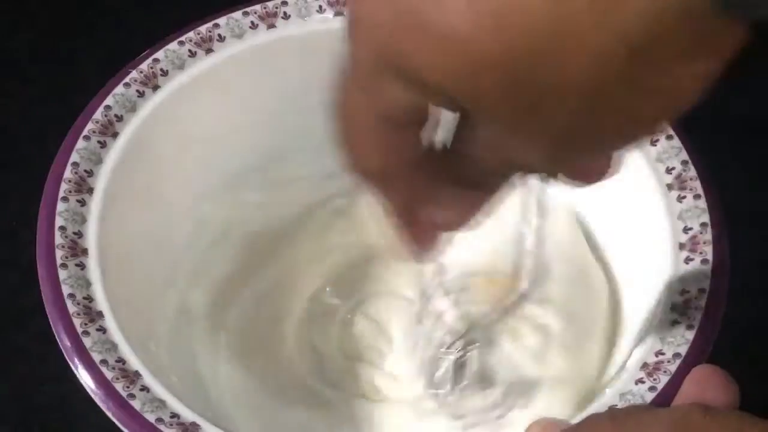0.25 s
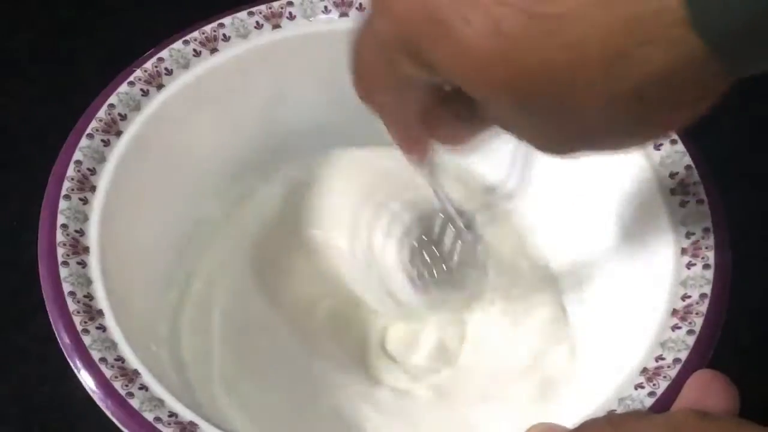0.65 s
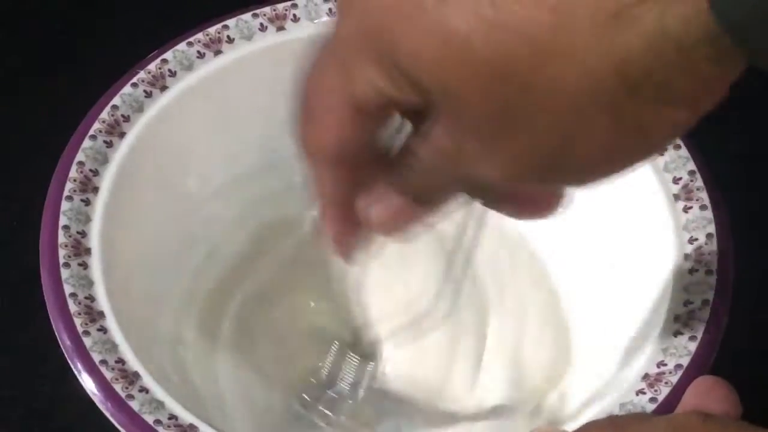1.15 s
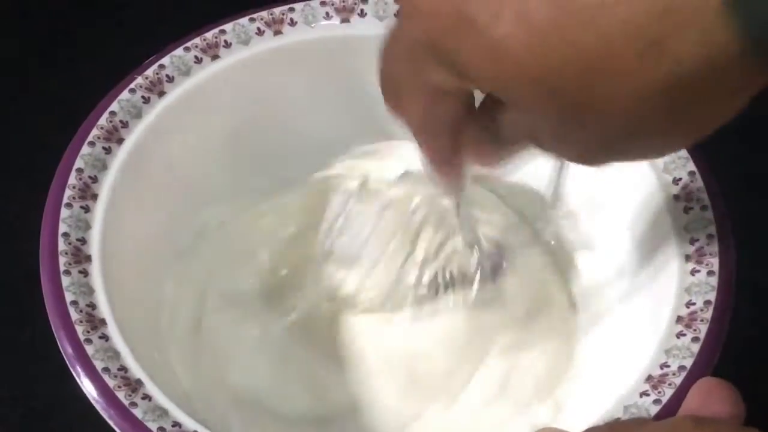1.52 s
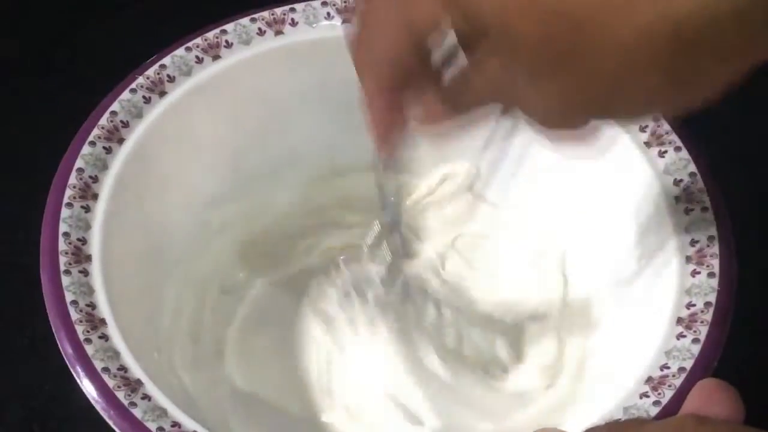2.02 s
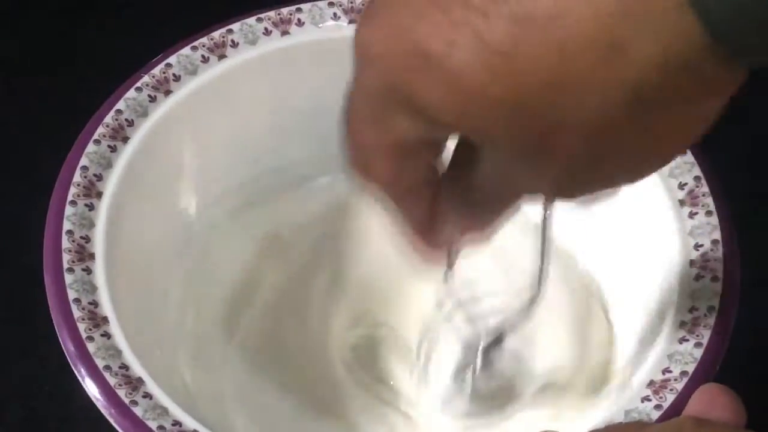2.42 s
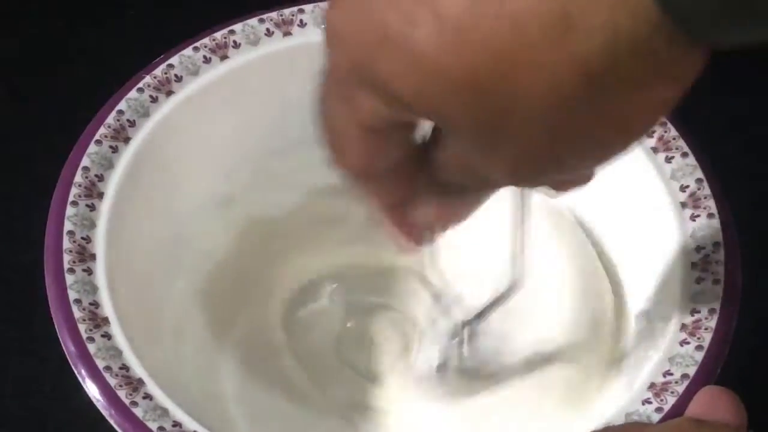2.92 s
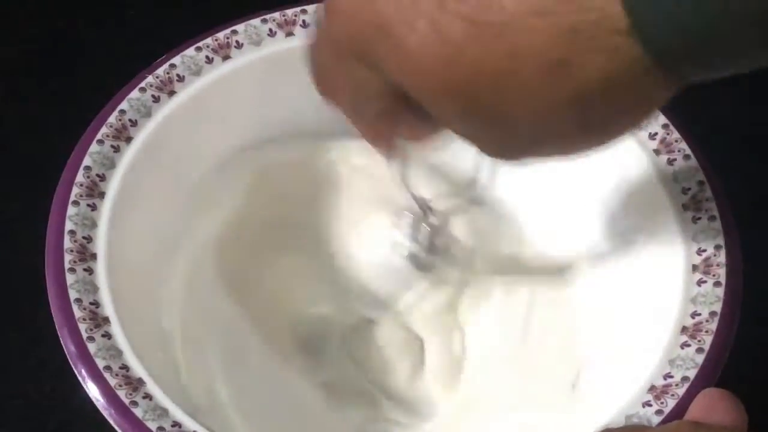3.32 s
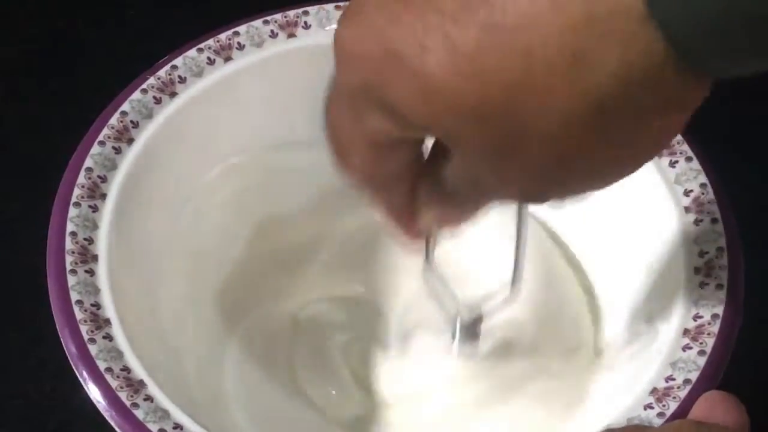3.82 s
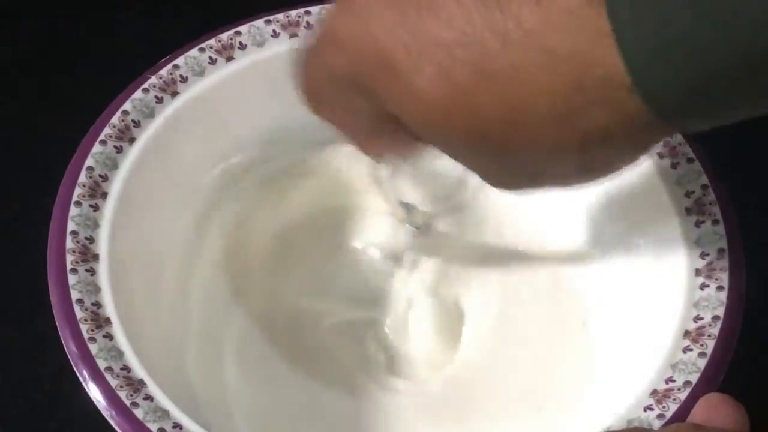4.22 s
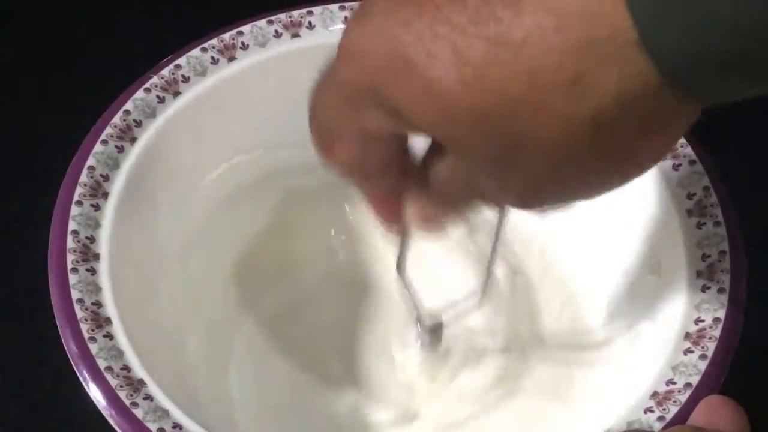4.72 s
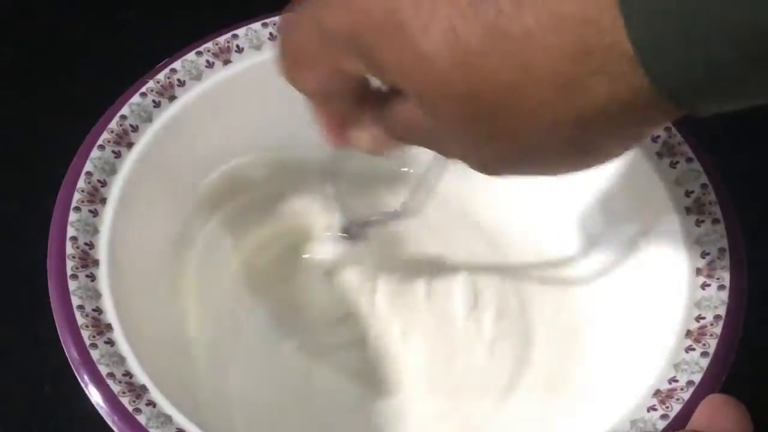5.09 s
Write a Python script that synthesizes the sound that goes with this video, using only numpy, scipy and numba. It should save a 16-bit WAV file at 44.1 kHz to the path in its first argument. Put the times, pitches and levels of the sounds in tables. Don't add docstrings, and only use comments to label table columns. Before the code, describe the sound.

A wire whisk whirls fast through thick cream in a hard plastic bowl, its wires clicking, knocking and scraping wetly, close up.

```python
import sys
import numpy as np
from scipy import signal
from scipy.fft import rfft, irfft
from scipy.io import wavfile
from scipy.ndimage import uniform_filter1d
from numba import njit

SR = 44100
rng = np.random.default_rng(int(sys.argv[2]) if len(sys.argv) > 2 else 0)


def persist_wave(psi):
    counts = np.round(np.clip(psi, -1, 1) * 32767).astype(np.int16)
    wavfile.write(sys.argv[1], SR, np.atleast_2d(counts).T)


def boost(x):
    u = np.asarray(x, float) / 20
    return 10 ** u


N = 236050

# [t/s, peak level/dB, wall ring f/Hz, ring level/dB re peak, skid level/dB]
KNOCKS = [(.0088, -14, 1721, -5.5, -50.5), (0.7316, -22, 910.7, -18, -61),
          (0.9575, -15.5, 1130, -23.5, -34.5), (1.312, -14.5, 4350, -9, -56.5),
          (1.5694, -6.5, 1620, -9, -31), (1.573, -5, 790, -12, -55.5), (1.5778, -22.5, 6624, 1, -58.5),
          (1.628, -10.5, 4396, -13, -58.5), (1.7779, -10, 835.1, -4, -27), (1.782, -9.5, 1639, -5.5, -50),
          (1.871, -13.5, 861.4, -22, -53.5), (1.9687, -19, 4100, -2.5, -60.5), (1.992, -7, 6379, 0, -15.5),
          (1.9965, -10, 8700, -5, -56.5), (2.1012, -10, 4234, -18.5, -32), (2.3956, -24, 4096, 13, -39.5),
          (2.6996, -15.5, 2584, -1, -61.5), (3.034, -15.5, 5244, -9.5, -47.5),
          (3.164, -17.5, 2796, -25, -34), (3.753, -17, 2560, 2.5, -45.5), (4.3251, -17, 952.5, -3.5, -40),
          (4.4936, -15.5, 905.2, -26.5, -30.5), (4.97, -14, 1022, -13.5, -53.5),
          (5.1707, -12.5, 3488, -16.5, -38.5)]
# [t/s, peak level/dB, wall ring f/Hz, skid level/dB]
TICKS = [(0.2544, -26.5, 1954, -57.5), (0.6586, -20, 2679, -40), (0.83, -19.5, 1546, -54.5),
         (1.0346, -20, 1081, -46), (1.134, -17.5, 3966, -40.5), (1.1853, -22, 4100, -37.5),
         (1.367, -22, 1870, -63.5), (1.4428, -20, 1917, -42), (1.516, -25.5, 843.6, -45),
         (1.848, -17.5, 2016, -58.5), (2.055, -23, 1973, -40), (2.197, -19, 2733, -71),
         (2.229, -23, 819.1, -39), (2.276, -27.5, 5846, -33), (2.6539, -17.5, 4119, -49.5),
         (3.069, -16, 1441, -58), (3.3516, -25, 2855, -32.5), (3.385, -17, 1453, -41),
         (3.449, -25, 3900, -64.5), (3.4798, -25, 2835, -67), (3.542, -49.5, 1485, -39.5),
         (3.614, -17, 1454, -35), (3.6958, -18.5, 2898, -49), (3.852, -22, 2293, -31),
         (3.932, -23, 1278, -41.5), (3.9953, -27.5, 3940, -45.5), (4.117, -19.5, 1206, -33),
         (4.175, -21.5, 1650, -34.5), (4.723, -45, 4433, -37.5), (4.877, -24.5, 3515, -55)]
# [t/s, peak level/dB, wall ring f/Hz, ring level/dB re peak]
BOUNCES = [(.321, -21.5, 2450, -3), (0.37, -21.5, 2021, -7.5), (0.5016, -20, 1140, -25),
           (0.5648, -20, 1278, -11), (0.679, -15.5, 2831, -17), (1.1734, -24, 1701, -21),
           (1.2147, -21.5, 4416, -17), (1.326, -20, 2958, -9), (1.341, -29, 2069, 5),
           (1.64, -29.5, 971, -12), (1.6585, -18.5, 1639, -10), (1.6823, -26, 790, -10),
           (1.755, -18, 1976, -8), (1.8328, -21, 1490, -2.5), (1.9056, -20, 2450, -5.5),
           (2.0059, -27, 790, 4), (1.9945, -36, 910, -3), (2.08, -16.5, 1416, -13),
           (2.4596, -21.5, 2819, -11.5), (2.806, -26, 2776, -5.5), (2.8783, -19, 3851, -9),
           (2.9491, -23, 1069, -6), (2.977, -24.5, 3578, 6), (3.1878, -16, 3953, -10),
           (3.2544, -19.5, 3135, -8), (3.4052, -36, 2832, 10.5), (3.5867, -21, 3607, -24.5),
           (3.8655, -23, 2660, 0.5), (3.9502, -23, 3883, -5), (4.129, -21.5, 936.2, -5),
           (4.7369, -30.5, 4326, 0)]
# [t/s, peak level/dB, wall ring f/Hz, ring level/dB
MORE_CONTACTS = [(0.307, -26, 3558, 2.5), (.327, -26.5, 4099, 2), (0.463, -26, 4306, -6.5),
                 (0.746, -38.5, 4049, 11), (0.812, -42.5, 1412, 0), (.917, -23, 3901, 1.5),
                 (1.086, -23.5, 6496, -2.5), (1.115, -21, 1904, -4.5), (2.1738, -25.5, 4100, -9.5),
                 (3.103, -23.5, 2928, -7.5), (3.266, -25.5, 4433, -7), (3.709, -30, 8393, 2),
                 (3.7459, -37, 2900, 4), (3.8048, -30, 2501, -1.5), (3.857, -20.5, 7266, -8),
                 (3.879, -29, 3086, 5.5), (4.3165, -22, 6006, -11.5), (4.3275, -19, 2032, -2),
                 (4.408, -39.5, 2910, 5), (4.4597, -36, 3487, -5.5), (4.4975, -31, 4424, -1.5),
                 (4.553, -36.5, 2835, 7), (4.613, -36.5, 2492, 5), (4.769, -38, 2797, 9.5), (4.832, -32, 3084, 3),
                 (.275, -31, 3232, 0), (2.008, -28.5, 3782, -1), (2.131, -29.5, 3610, 4), (2.141, -29, 4417, 3),
                 (2.246, -36, 3710, 7), (3.593, -26.5, 5697, 2), (3.906, -31, 5719, -0.5), (5.13, -36.5, 2604, 6),
                 (5.315, -37.5, 3186, 2)]
# [t/s, peak level/dB, wall ring f/Hz]
TAPS = [(0.126, -33, 1635), (0.479, -25.5, 6760), (0.512, -25.5, 1123), (0.744, -27, 948.7),
        (0.8, -35, 1421), (1.149, -22, 6265), (1.198, -24, 6762), (1.243, -32, 1731), (1.298, -27, 4350),
        (2.04, -25, 1068), (2.348, -37.5, 2000), (2.39, -28.5, 4301), (2.54, -31.5, 4272),
        (2.638, -25.5, 4272), (2.648, -26.5, 3912), (2.891, -22, 3534), (2.961, -25.5, 3390),
        (3.024, -25, 4399), (3.173, -21.5, 4083), (3.38, -23.5, 1559), (3.54, -31.5, 1710),
        (3.632, -22.5, 3228), (3.761, -26.5, 5250), (3.785, -48, 2320), (3.959, -27.5, 2401),
        (4.286, -24.5, 4174), (5.002, -38.5, 940.6), (5.182, -28.5, 1137), (5.216, -26.5, 5550),
        (5.243, -37, 1551)]
# [t/s, peak level/dB]
FLICKS = [(0.1424, -22), (0.2452, -21), (0.2718, -25.5), (0.2972, -18.5), (0.3883, -14.5), (0.444, -20),
          (0.6165, -37.5), (0.7186, -31.5), (0.847, -17), (0.9113, -30.5), (1.467, -20), (1.7917, -13.5),
          (1.8922, -24), (2.339, -19.5), (2.596, -21), (2.902, -16.5), (2.9312, -19.5), (3.171, -31.5),
          (3.332, -31.5), (3.428, -23.5), (3.5256, -34.5), (3.837, -17.5), (3.9765, -21.5), (4.147, -24.5),
          (4.1644, -14.5), (4.353, -19.5), (4.818, -18.5), (5.0361, -19.5), (5.0774, -33), (5.096, -23.5)]
# [f/Hz, level/dB, t60/s]
DAMPED_MODES = [(790, -11, 0.0613), (1620, -9.5, 0.06165), (2320, -9.5, 0.04145), (2590.2, -5.5, 0.0382),
                (3534.9, 2.5, 0.01914), (4350, 10, 0.01694), (5750, 3, 0.03392), (6383.5, 1, 0.04113),
                (6974, 3, 0.01502), (8700, 3.5, 0.0196)]
# [t/s, scrape level/dB, weight on the bowl floor level/dB re scrape]
HAND_EFFORT = [(0.05, -46.5, -10), (.5, -46.5, -43.5), (.76, -44, -34.5), (1.17, -48, -8.5), (1.4, -49, -5),
               (1.5, -51.5, 3.5), (1.58, -46.5, 3.5), (1.95, -46.5, 2.5), (2.37, -45, -6), (2.47, -45, -21),
               (2.58, -47.5, -14), (2.63, -44.5, -14), (2.8, -44, -32), (3.85, -44.5, -3.5),
               (4.1, -47, -5.5), (4.7, -48, -2), (5.2, -45, -12), (5.35, -50, 4.5)]
# [quietest t/s, half length t/s, change of level/dB]
LIFTS = [(0.092, 0.043, -1), (0.186, 0.09, -4), (.64, 0.013, -0.5), (0.772, 0.0157, -6), (0.888, .015, 0),
         (0.998, 0.0276, -4), (1.403, 0.035, 1), (1.496, 0.0193, -3), (1.715, 0.0225, -4),
         (1.934, 0.027, -4), (2.327, .01, 1), (2.496, 0.0245, -3.5), (2.567, 0.0183, -2),
         (2.84, 0.019, -1.5), (3.147, 0.0112, 0.5), (3.302, 0.019, -3), (3.663, 0.013, 0.5),
         (3.74, 0.0112, -0.5), (3.925, .018, -4), (4.092, 0.0216, -5.5), (4.158, 0.0089, -1.5),
         (4.41, 0.0175, 1.5), (4.644, 0.032, 0), (4.906, 0.0174, -2), (5.185, 0.0103, -6),
         (5.286, 0.014, -1.5)]
# [loudest t/s, rise t/s, level/dB, air pocket f/Hz]
SWEEPS = [(0.148, 0.02645, -48.5, 6106), (.221, 0.02455, -63.5, 1863), (.322, 0.017823, -33.5, 2292),
          (0.399, 0.0246, -40.5, 5507), (.452, 0.01737, -37, 3644), (0.567, 0.02734, -38.5, 1224),
          (0.797, 0.0203, -39.5, 1284), (0.916, 0.01593, -36, 5501), (1.079, 0.025934, -31, 4233),
          (1.263, 0.0376, -41.5, 1990), (1.609, 0.051, -40.5, 2403), (1.85, 0.03245, -45.5, 2008),
          (2.03, 0.02516, -43.5, 3634), (2.172, 0.0201, -60, 4100), (2.457, 0.00992, -43.5, 2737),
          (2.724, 0.01368, -36, 3737), (2.895, 0.03958, -49, 3631), (2.98, 0.02047, -39, 3632),
          (3.107, 0.00604, -36, 2885), (3.268, 0.00551, -45.5, 4223), (4.246, 0.017, -38, 3101),
          (4.291, 0.01739, -43, 4576), (4.364, 0.01519, -35.5, 2965), (4.463, 0.0133, -40, 4379),
          (4.557, 0.0239, -36.5, 5424), (4.8, 0.0146, -37, 2695), (4.857, 0.002742, -33, 2898),
          (5.03, 0.0207, -54.5, 3430), (5.235, 0.011926, -34.5, 2899), (5.317, 0.02233, -38, 3062)]
# [t/s, length t/s, start f/Hz, end f/Hz, level/dB]
SQUEAKS = [(0.245, 0.04178, 1970, 2020, -44.5), (0.296, 0.02017, 1111, 1160, -39),
           (0.312, 0.03518, 2155, 2461, -48), (0.559, 0.01992, 1108, 1177, -35),
           (0.58, 0.019245, 1276, 1342, -30.5), (0.671, 0.02058, 2720, 2809, -42),
           (0.794, 0.0115, 1284, 1351, -46), (0.813, 0.01674, 1406, 1481, -43),
           (.83, .012, 1490, 1607, -40), (0.903, 0.026694, 2483, 2933, -36.5),
           (0.967, 0.0192, 1197, 1259, -39.5), (1.035, 0.0278, 1403, 1879, -42),
           (1.109, 0.02107, 1696, 2011, -43.5), (1.231, 0.03402, 1402, 1954, -47),
           (2.081, 0.01812, 1477, 1354, -37), (2.575, 0.02238, 2220, 1791, -47.5),
           (2.715, 0.0916, 1380, 1427, -51), (2.951, 0.03936, 1111, 1459, -43.5),
           (3.6, 0.01714, 1161, 1286, -39.5), (3.733, 0.02072, 2835, 2527, -45)]
# [t/s, length t/s, start f/Hz, end f/Hz, level/dB]
SQUELCHES = [(0.517, 0.035, 4200, 3835, -42), (0.513, 0.04135, 1142, 1157, -45.5),
             (.56, 0.01213, 5750, 5750, -32), (0.679, 0.01238, 5405, 5390, -41.5),
             (0.783, 0.02918, 5780, 5955, -43.5), (0.905, 0.0255, 5431, 5544, -35.5),
             (1.293, 0.0109, 4202, 4235, -41), (2.275, 0.04676, 5570, 6259, -44.5),
             (2.269, 0.02384, 1821, 1905, -40), (2.326, 0.02763, 1771, 1911, -46),
             (2.384, 0.02644, 2671, 2476, -37.5), (2.394, 0.00809, 2868, 5603, -26),
             (2.645, 0.00769, 6946, 7022, -38), (2.652, 0.0101, 3928, 4026, -36),
             (2.811, 0.0857, 1400, 1401, -50.5), (2.959, 0.00778, 4100, 3845, -37),
             (2.97, 0.01976, 3549, 3701, -35.5), (3.03, 0.04406, 1403, 1481, -51),
             (3.628, 0.01277, 3266, 3339, -46.5), (3.78, 0.01663, 2095, 2280, -39),
             (3.862, 0.01951, 2624, 2453, -41), (3.985, 0.05007, 1288, 1361, -51.5),
             (4.211, 0.0302, 1534, 1213, -43), (4.244, 0.02835, 3206, 3077, -41.5),
             (5.078, 0.0243, 1557, 1500, -46.5), (5.204, 0.01428, 5555, 5805, -45.5),
             (5.227, 0.0239, 2810, 3007, -55), (5.235, 0.014605, 1598, 1646, -41),
             (5.252, 0.02444, 1124, 1150, -47.5), (5.308, 0.0488, 3200, 3279, -45.5),
             (0.134, 0.0266, 1708, 1681, -47.5), (0.2, 0.03225, 1854, 1923, -51.5),
             (0.317, 0.04305, 1328, 1369, -47), (0.142, 0.00951, 5504, 5488, -42),
             (1.062, 0.02221, 5562, 5852, -39), (1.273, 0.0548, 1890, 2292, -44),
             (3.385, 0.03236, 1477, 1572, -42.5), (3.265, 0.00677, 4198, 4465, -35),
             (3.53, 0.02216, 1775, 1755, -42), (3.197, 0.02117, 3979, 4187, -40)]
# [f/Hz, spectral level/dB]
BOWL_COLOUR = [(290, -36), (500, -37), (623, -6), (810, -4.5), (1570, -1), (2160, -10), (2540, 3),
               (3160, 1), (4290, -0.5), (4900, 1.5), (6470, 1), (10600, 0), (12900, 3), (15600, 1.5),
               (16900, -10)]
# [f/Hz, width f/Hz, level/dB]
WALL_RESONANCES = [(1265.3, 1016, 3.5), (1650, 1000, -23), (2450, 457.7, 5), (4100, 79.6, 0)]
# [f/Hz, spectral level/dB]
KITCHEN_COLOUR = [(19, -18.5), (32, -2), (117, 2.5), (189, -5), (249, -7), (305, -7.5), (434, -7.5),
                  (512, -16), (650, -13), (840, -27), (1430, -120)]
# [f/Hz, width f/Hz, level/dB]
HUM = [(43.45, 11.59, -67.5), (61.55, 13.12, -70), (106.83, 5.59, -65), (147.27, 2.864, -69),
       (295.34, 8.593, -71)]
# [start t/s, length t/s, level/dB]
LABOUR = [(0.117, 0.1505, 13), (1.752, 0.5678, 11.5), (3.902, 0.6246, 11.5), (4.796, 0.5377, 14.5)]
# [start t/s, length t/s, level/dB]
OVERTONE_SWELL = (1.4654, 0.5233, 7.31)

TICK_RING_DB = -9
FLICK_DB, FLICK_RING_HZ, FLICK_RING_DB = -5.5, 2560, -15
TAP_DB, TAP_RING_DB = 2, -5.5
WIRE_LOW_HZ, WIRE_HIGH_HZ = 6814.3, 14914
HARD_DB, HARD_BIAS = -23.5, 0.6296
CRACK_S, SOFT_FROM_DB, SOFT_STRETCH = 0.0007, -16, 0.3
REBOUND_S, REBOUND_DB = .0016, -9
MODE_DB, MODE_SCATTER_DB = -11, 7.5
BOWL_LOW_HZ, BOWL_LOW_WIDTH_HZ = 860, 420
SKID_LATE_S, SKID_RISE_S, SKID_FALL_S = 0.000994, .0045, 0.018335
SKID_HALVES_DB = 10
OCTAVE_DB, OCTAVE_DB_PER_OCTAVE = -45, 10
SQUELCH_WIDTH = 0.03573
STUTTER_S, STUTTER_DB = 0.0039686, 1.5
WOBBLE = .02
ROOM_T60_S, ROOM_DB = 0.35, -13
KITCHEN_DB = -59.5


def ticks():
    crack, ring = np.zeros(N), np.zeros(N)
    t = np.arange(2000) / SR
    mode_hz, mode_db, t60 = np.transpose(DAMPED_MODES)[:, :, None]
    modes = boost(mode_db) * np.sin(2 * np.pi * mode_hz * t) * decay(t, t60)
    for s, db, wall_hz, wall_db in contacts():
        loop = rng.random() ** boost(-HARD_BIAS * max(db - HARD_DB, 0))
        wire_hz = WIRE_LOW_HZ * (WIRE_HIGH_HZ / WIRE_LOW_HZ) ** loop
        soft = boost(SOFT_STRETCH * np.clip(SOFT_FROM_DB - db, 0, 12))
        onset = 1 - np.exp(-t / 0.00019067 / soft)
        blow = onset * (np.exp(-t / CRACK_S / soft) + boost(-19) * np.exp(-t / 0.008954))
        late = int(REBOUND_S * (.5 + rng.random()) * SR)
        blow = blow + boost(REBOUND_DB) * np.pad(blow, (late, 0))[:len(t)]
        snap, push = rng.standard_normal((2, len(t))) * blow
        wire = band(snap, wire_hz, 1463.3)
        wall = band(push, wall_hz, 120 + 0.01717 * wall_hz)
        hit = snap + boost(-9.5) * np.diff(snap, prepend=0) + boost(12.0) * wire
        place = boost(MODE_SCATTER_DB * rng.standard_normal(len(modes)))
        body = signal.fftconvolve(push, place @ modes)[:len(t)]
        add(crack, s, peak(hit, db - 3.5))
        add(ring, s, peak(wall, db + wall_db - 10.5) + peak(body, db + MODE_DB - 8.0))
    return colour(crack, BOWL_COLOUR) * boost(-2.5) + ring


def contacts():
    hard = [knock[:4] for knock in KNOCKS]
    light = [(s, db, hz, TICK_RING_DB) for s, db, hz, _ in TICKS]
    faint = [(s, db + FLICK_DB, FLICK_RING_HZ, FLICK_RING_DB) for s, db in FLICKS]
    touches = [(s, db + TAP_DB, hz, TAP_RING_DB) for s, db, hz in TAPS]
    return hard + light + BOUNCES + faint + touches + MORE_CONTACTS


def drag():
    time = np.arange(N) / SR
    s, *columns = np.transpose(HAND_EFFORT)
    scrape_db, low_db = (np.interp(time, s, column) for column in columns)
    for s, half, db in LIFTS:
        scrape_db = scrape_db + db * np.exp(-((time - s) / half) ** 2)

    fine_grit = level(grit(350, 2.792, 0.007604), -7.5)
    coarse_grit = level(grit(80, 2.214, 0.01827), -15.5)
    rub = (fine_grit + coarse_grit + boost(-4.5)) * rng.standard_normal(N)
    wall = sum(boost(db) * band(rub, hz, width) for hz, width, db in WALL_RESONANCES)
    scrape = level(colour(patchy(rub, 4.2546, 45), BOWL_COLOUR), -3.5)
    scrape = scrape + level(wall, -9.5) + level(bubbles(300, 871.87, 6111.5), -9.0)
    low = band(rub, BOWL_LOW_HZ, BOWL_LOW_WIDTH_HZ)
    low = patchy(band(low, BOWL_LOW_HZ, 2 * BOWL_LOW_WIDTH_HZ), 3.831, 24.515)

    pressure, pockets = boost(scrape_db), np.zeros(N)
    for s, rise, fall, db, hz in skids():
        t = np.arange(-int(2.8 * rise * SR), int(5 * fall * SR)) / SR
        t = t[t + s > 0]
        swell = np.exp(-.8 * (t / rise) ** 2)
        shape = boost(db) * np.where(t < 0, swell, 1 / np.cosh(1.3136 * t / fall))
        pocket = svf(rng.standard_normal(len(t)), hz * (1 + 2.2 * t), 100 + 0.04 * hz)
        add(pressure, s + t[0], boost(-10) * shape)
        add(pockets, s + t[0], shape * level(pocket, -15.5))

    treble = highpass(scrape, 2, 7000)
    scrape = scrape + treble * (np.clip(pressure / boost(-46.0), 0, 3) ** 0.3561 - 1)
    sound = pressure * scrape + pockets + boost(scrape_db + low_db) * level(low, -8.0)
    return passband(sound, 15800)


def skids():
    after = []
    for s, _, hz, *_, db in KNOCKS + TICKS:
        shorter = .5 ** (max(db + 39.5, 0) / SKID_HALVES_DB)
        after.append((s + SKID_LATE_S, SKID_RISE_S * shorter, SKID_FALL_S * shorter, db, hz))
    return after + [(s, rise, rise, db, hz) for s, rise, db, hz in SWEEPS]


def grit(rate, spread_db, t60):
    size = boost(spread_db * np.minimum(rng.exponential(size=N), 3.5))
    kicks = (rng.random(N) < rate / SR) * size
    return signal.lfilter([1], [1, -decay(1 / SR, t60)], kicks)


def patchy(x, flicker_db, rate):
    centres = 700 * 2 ** np.arange(0, 4.6, 1 / 3)
    return sum(boost(flicker_db * walk(rate)) * band(x, hz, hz / 4) for hz in centres)


def bubbles(rate, low_hz, high_hz):
    out = np.zeros(N)
    for when, pitch, size, span in rng.random((int(rate * N / SR), 4)):
        hz = low_hz * (high_hz / low_hz) ** pitch
        t = np.arange(int((.004 + .012 * span) * SR)) / SR
        puff = svf(rng.standard_normal(len(t)), hz * (1 + 4.602 * t), 0.05194 * hz)
        add(out, when * N / SR, level(puff * np.sin(np.pi * t / t[-1]), -14 * size))
    return out


def squeaks():
    out = np.zeros(N)
    for s, length, from_hz, to_hz, db in SQUEAKS:
        octave = boost(OCTAVE_DB + OCTAVE_DB_PER_OCTAVE * np.log2(from_hz / 1200))
        u = np.linspace(0, 1, int(max(length, .005) * SR))
        hz = (from_hz + (to_hz - from_hz) * u) * wobble(len(u))
        phase = 2 * np.pi * np.cumsum(hz) / SR
        shake = rng.standard_normal((2, len(u)))
        clean = np.sin(phase) + octave * np.sin(2 * phase)
        rough = svf(svf(shake[0], hz, 118.16), hz, 284.0) + octave * svf(shake[1], 2 * hz, 400.)
        shape = np.sin(np.pi * u) ** 0.466 * stutter(len(u)) ** 0.632
        add(out, s, shape * boost(db) * (0.5172 * clean + level(rough, -7.0)))
    return out


def squelches():
    out = np.zeros(N)
    for s, length, from_hz, to_hz, db in SQUELCHES:
        u = np.linspace(0, 1, int(max(length, .004) * SR))
        hz = (from_hz + (to_hz - from_hz) * u) * wobble(len(u))
        width = SQUELCH_WIDTH * from_hz
        wet = svf(svf(rng.standard_normal(len(u)), hz, width), hz, 3 * width)
        tone = np.sin(2 * np.pi * np.cumsum(hz) / SR)
        shape = np.sin(np.pi * u) ** 0.1838 * stutter(len(u))
        add(out, s, shape * boost(db - 2.5) * (0.44 * tone + level(wet, -6.0)))
    return out


def stutter(count):
    k = int(STUTTER_S * SR)
    steps = np.repeat(rng.standard_normal(count // k + 1), k)[:count]
    return boost(STUTTER_DB * uniform_filter1d(steps, k // 2))


def wobble(count):
    return stutter(count) ** (WOBBLE / np.log(boost(STUTTER_DB)))


def kitchen():
    hum = [level(band(rng.standard_normal(N), hz, width), db) for hz, width, db in HUM]
    load_db = np.full(N, -3.)
    for s, length, db in LABOUR:
        add(load_db, s, db * np.sin(np.linspace(0, np.pi, int(length * SR))) ** .5)
    hum[3] = hum[3] * boost(load_db)
    s, length, db = OVERTONE_SWELL
    from_middle = (np.arange(N) / SR - s - length / 2) / length * 2
    hum[4] = hum[4] * boost(db * np.exp(-from_middle ** 4))
    return level(colour(rng.standard_normal(N), KITCHEN_COLOUR), KITCHEN_DB) + sum(hum)


def level(x, db):
    return x * boost(db) / np.sqrt(np.mean(x ** 2))


def peak(x, db):
    return x * boost(db) / np.abs(x).max()


def decay(t, t60):
    return np.exp(-np.log(1000) * t / t60)


def walk(rate):
    k = int(SR / rate)
    return 1.1475 * uniform_filter1d(np.repeat(rng.standard_normal(N // k + 1), k), k)[:N]


def add(out, s, x):
    i = int(s * SR)
    out[i:i + len(x)] += x[:max(N - i, 0)]


def colour(x, points):
    hz, db = np.transpose(points)
    grid_hz = np.arange(2049) * SR / 4096
    log_gain = np.interp(np.log(grid_hz + 1), np.log(hz), db) * np.log(10) / 20
    cepstrum = irfft(log_gain)
    cepstrum[1:2048] *= 2
    cepstrum[2049:] = 0
    return signal.fftconvolve(x, irfft(np.exp(rfft(cepstrum))))[:len(x)]


@njit
def svf(x, hz, width):
    y, b, l = np.empty(len(x)), 0., 0.
    for i in range(len(x)):
        g, k = np.tan(np.pi * hz[i] / SR), width / hz[i]
        v = (b + g * (x[i] - l)) / (1 + g * (g + k))
        b, l, y[i] = 2 * v - b, l + 2 * g * v, k * v
    return y


def band(x, hz, width_hz):
    return svf(x, np.full(len(x), min(1. * hz, .45 * SR)), 1. * width_hz)


def highpass(x, order, hz):
    return signal.sosfilt(signal.butter(order, hz, "high", fs=SR, output="sos"), x)


def passband(x, top_hz):
    return signal.sosfilt(signal.ellip(10, .2, 80, top_hz, fs=SR, output="sos"), x)


def scene():
    near = highpass(ticks() + drag() + squeaks() + squelches(), 9, 700)
    t = np.arange(int(.3 * SR)) / SR
    tail = rng.standard_normal(len(t)) * decay(t, ROOM_T60_S) * (t > .003)
    wet = signal.fftconvolve(near, tail / np.sqrt(np.sum(tail ** 2)))[:N]
    return (near + boost(ROOM_DB) * passband(wet, 15600) + kitchen())[None]


def top_cut(x):
    return signal.sosfilt(signal.butter(12, 15900, fs=SR, output="sos"), x)


def record(dry):
    mix = highpass(dry, 4, 38)
    return top_cut(mix)


dry = scene()
out = record(dry)
persist_wave(out)
```